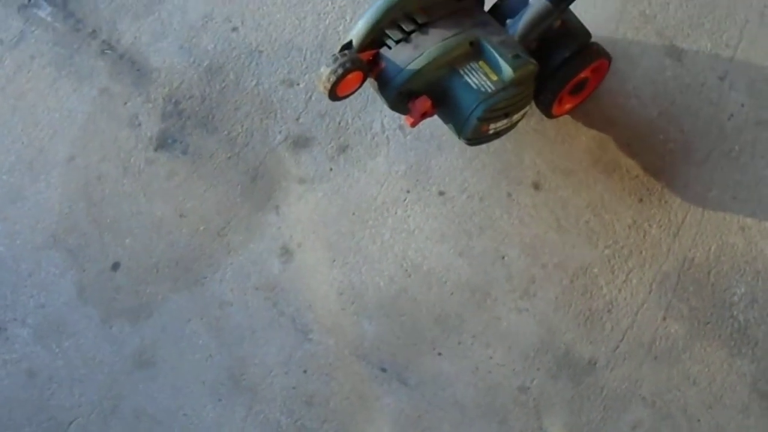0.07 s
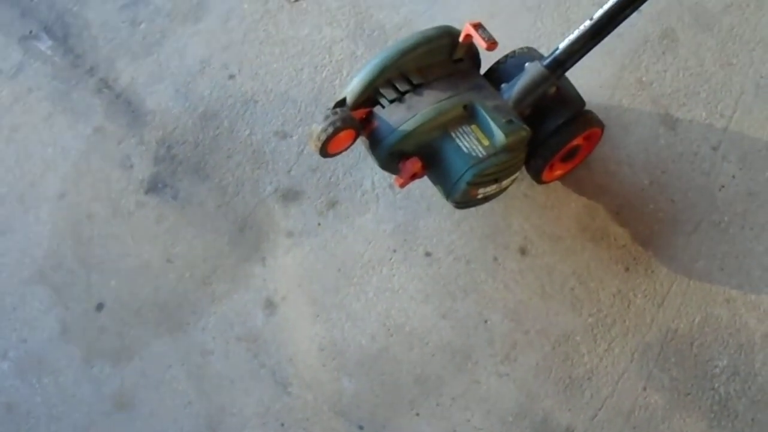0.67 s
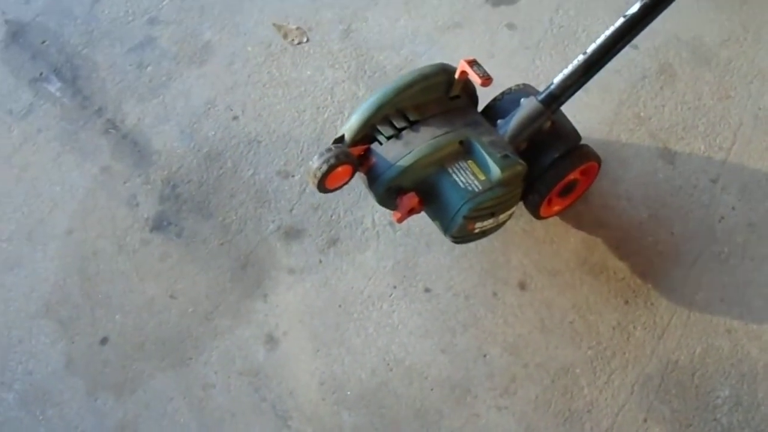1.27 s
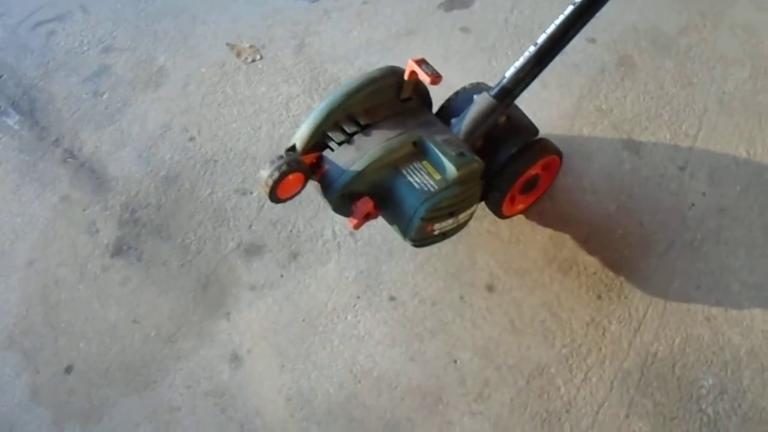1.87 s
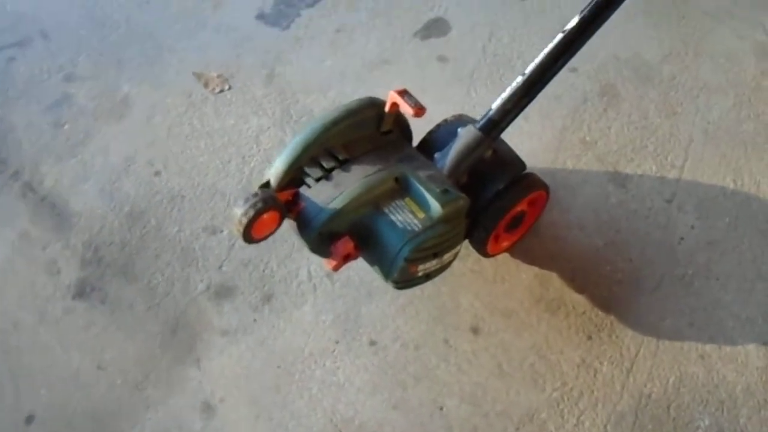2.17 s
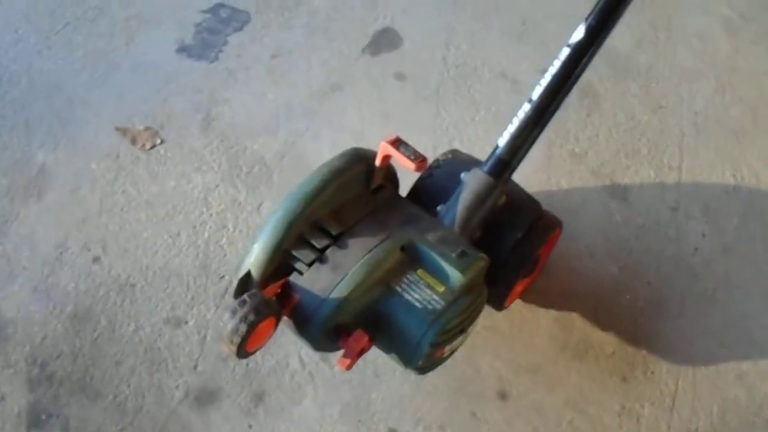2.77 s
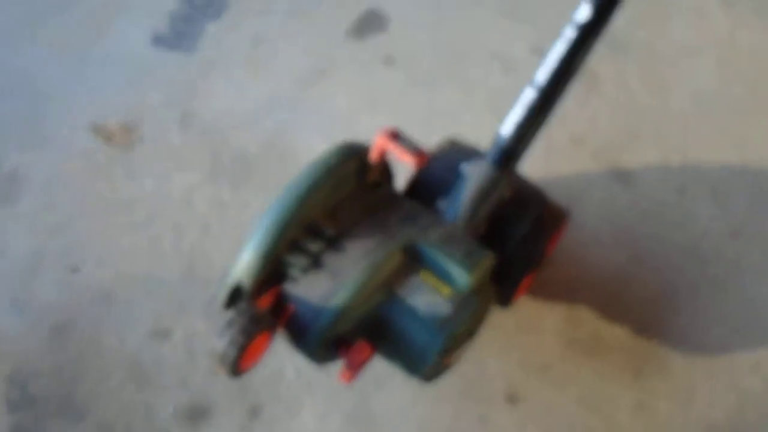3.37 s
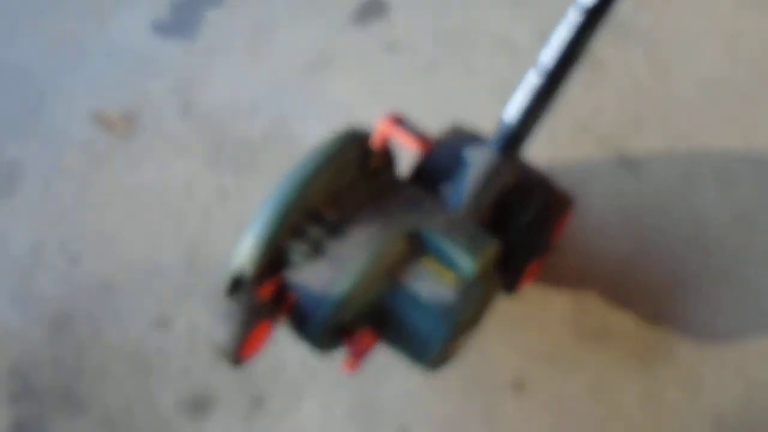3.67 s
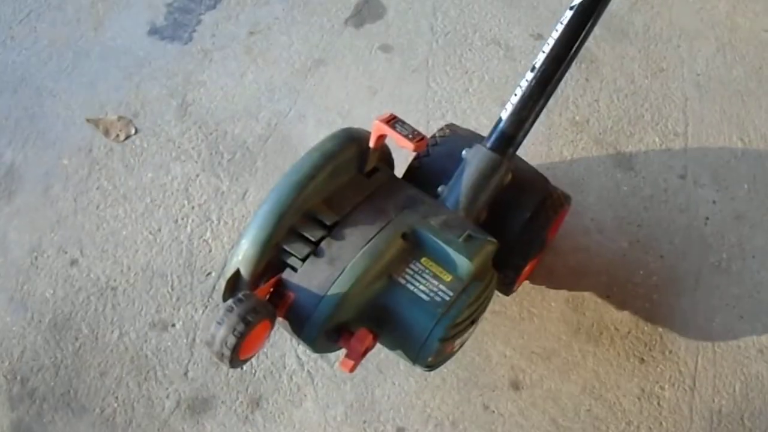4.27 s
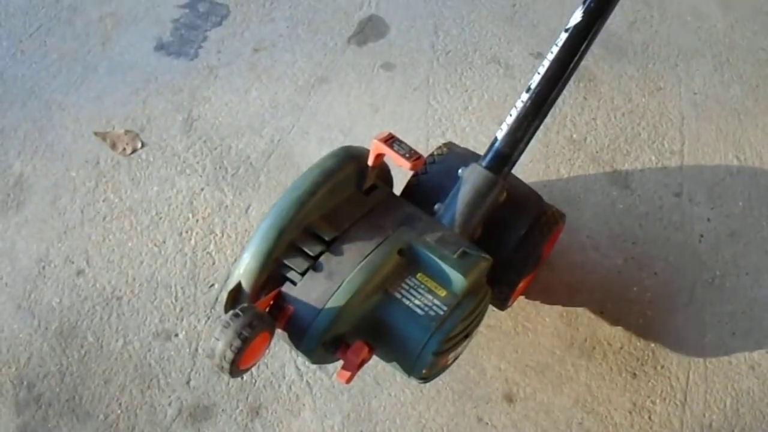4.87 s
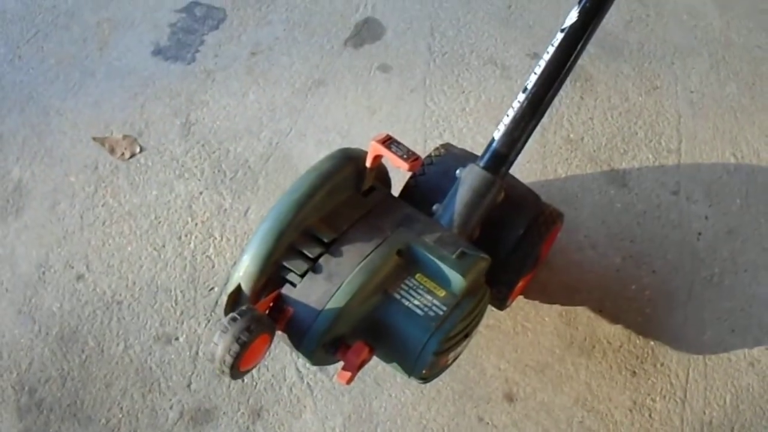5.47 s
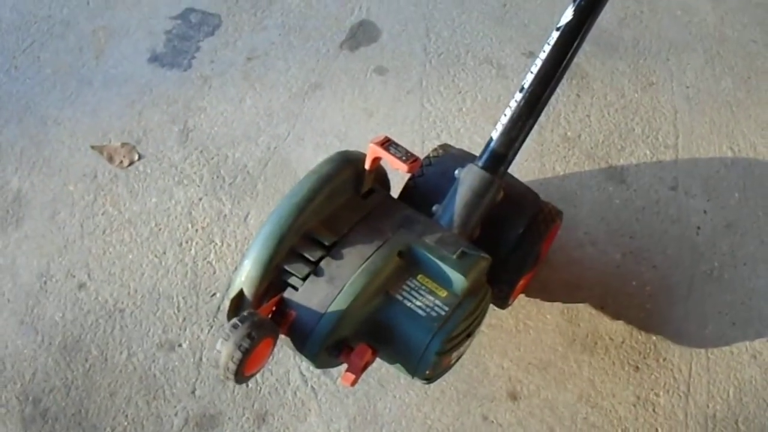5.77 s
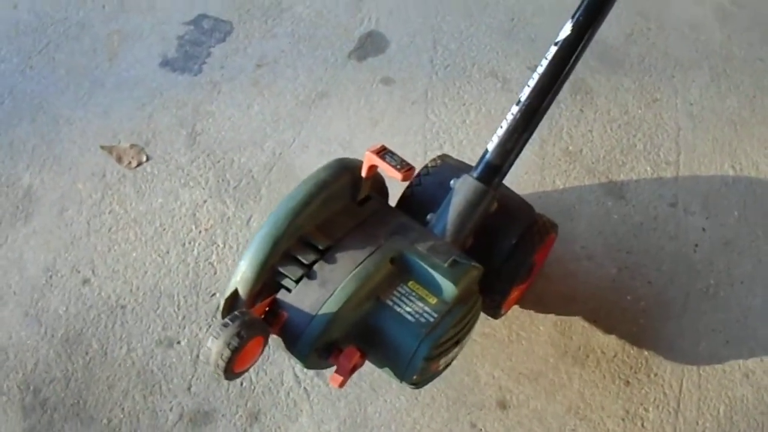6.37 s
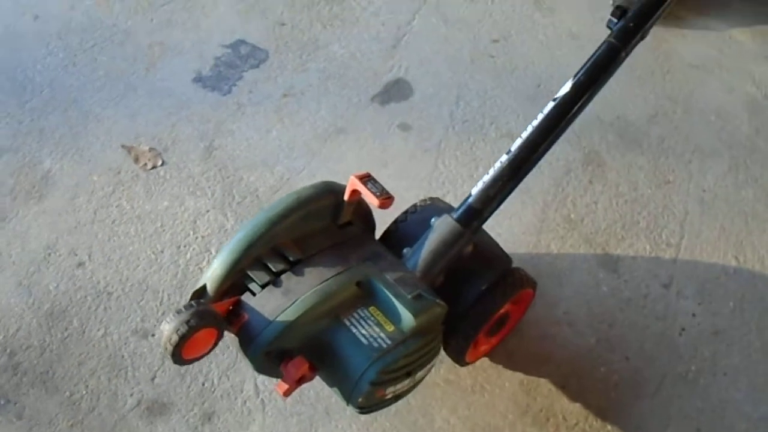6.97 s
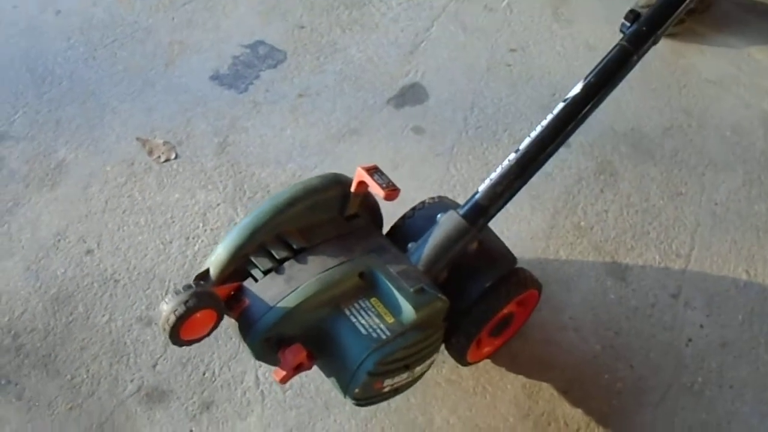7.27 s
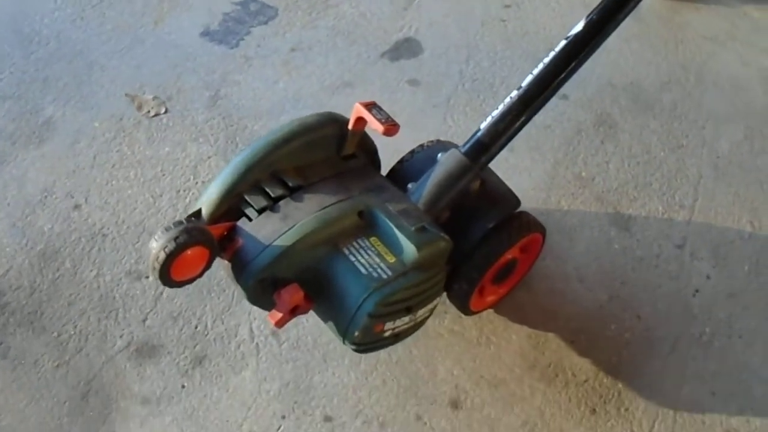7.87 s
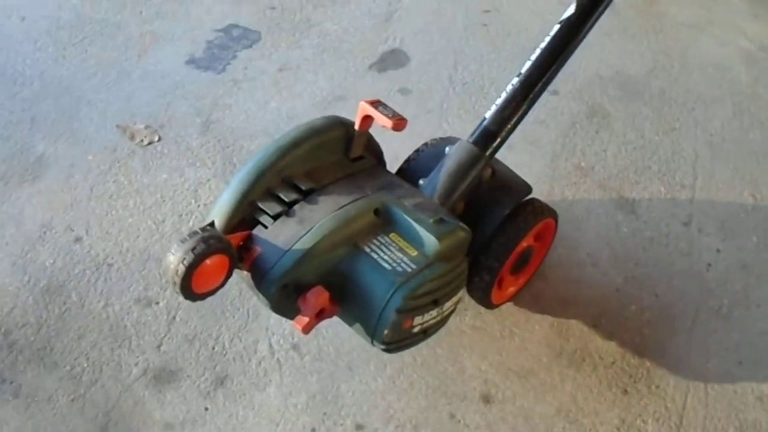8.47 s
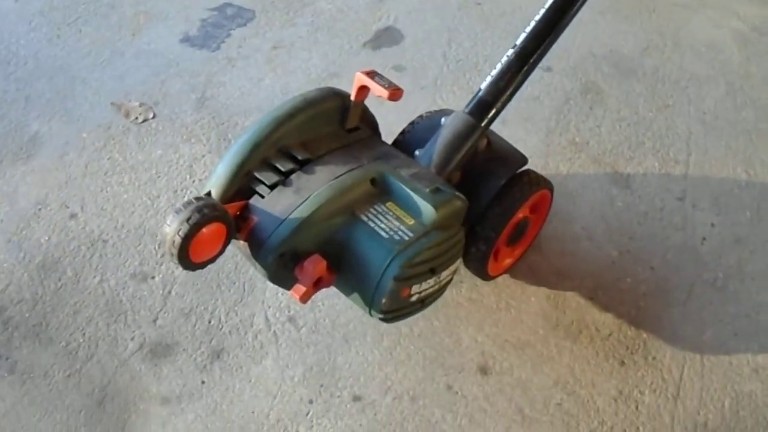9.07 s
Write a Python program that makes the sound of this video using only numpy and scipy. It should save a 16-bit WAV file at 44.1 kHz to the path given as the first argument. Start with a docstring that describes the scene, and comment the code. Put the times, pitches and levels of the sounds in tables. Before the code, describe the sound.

Loud, steady whirring of an electric edger running free indoors, its high whine wavering, with a single sharp click early on.

```python
"""An electric lawn edger whirs up and runs free over concrete, is tipped back and set down again.
Its fan and blade churn air that makes the guard and the vents ring. The motor hums, the gears rattle
at the start, and the fan whines at 14 times the motor's speed. Bare walls add a short echo.
A low sampling rate dulls the sound and mirrors the whine to a lower pitch; one sharp click cuts in."""
import sys
import numpy as np
from scipy import signal
from scipy.fft import rfft, irfft, next_fast_len
from scipy.io import wavfile

SR = 44100
rng = np.random.default_rng(int(sys.argv[2]) if len(sys.argv) > 2 else 0)


def materialize(psi):
    """Save the field psi as 16-bit PCM at rate SR to the path in sys.argv[1].

    A 1-D psi becomes a single channel; in a 2-D psi each row is a channel.
    """
    bounded = np.clip(np.atleast_2d(psi).T, -1, 1)
    quanta = np.round(bounded * 32767).astype(np.int16)
    wavfile.write(sys.argv[1], SR, quanta)


N = 406161
T = np.arange(N) / SR

START_HZ, FREE_HZ = 274, 399.4  # motor turns per second
COME_ROUND = (1.1, 1.5)  # the listener walks round to the guard's opening: start/s, length/s
# the vent's narrow beam of sound sweeps on and off the listener: t/s, level/dB below its peak
VENT_AIM = [(.9, -1), (1.65, -4), (1.9, -10.5), (2.5, -6.5), (2.85, -.5), (5.4, 0), (6.4, -3.5), (7.3, -10),
            (8.35, -7.5), (8.65, -3.5)]


def undb(db):
    """Turn decibels into a gain."""
    return 10 ** (np.asarray(db) / 20)


def unit(x):
    """Scale a signal to an average (rms) size of 1."""
    return x / np.sqrt(np.mean(x ** 2))


def curve(table):
    """Join (time, value) points with straight lines."""
    return np.interp(T, *np.transpose(table))


def shaped_noise(gain_at):
    """Noise whose strength at each frequency follows gain_at(f)."""
    size = next_fast_len(N, real=True)
    f = np.fft.rfftfreq(size, 1 / SR)
    return unit(irfft(rfft(rng.standard_normal(size)) * gain_at(f), size)[:N])


def walk(rate):
    """A smooth random wobble that changes about rate times a second."""
    return shaped_noise(lambda f: np.exp(-(f / rate) ** 2))


def turbulence(spectrum):
    """Swirling air: noise shaped by (f/Hz, level/dB) points."""
    hz, db = np.transpose(spectrum)
    return shaped_noise(lambda f: undb(np.interp(np.log(f + 1), np.log(hz), db)))


def cavity(hz, width, db):
    """Air blowing through a hollow: a band of noise, width Hz wide, around a pitch that may move."""
    lowpass = signal.butter(2, width / 2, fs=SR)
    eddies = signal.lfilter(*lowpass, rng.standard_normal(N) + 1j * rng.standard_normal(N))
    phase = 2 * np.pi * np.cumsum(hz * np.ones(N)) / SR
    return undb(db) * unit(np.real(eddies * np.exp(1j * phase)))


def move(start_s, length_s):
    """A movement's progress from 0 to 1."""
    return np.clip((T - start_s) / length_s, 0, 1)


def tipped():
    """How far the machine leans back, 0 to 1: it is tipped, held, then lowered."""
    return move(2.3, .7) - move(4.6, 2.3)


def speed(run_up_s=.28, sag_hz=2.8):
    """Motor turns per second: rising until air drag holds it, sagging a little while tipped."""
    return FREE_HZ / (1 + (FREE_HZ / START_HZ - 1) * np.exp(-T / run_up_s)) - sag_hz * tipped()


def facing(part):
    """How loud a part is as it turns toward or away from the listener."""
    # per part: level/dB, then change/dB when tipped back, listener come round, machine turned aside
    parts = { "fan": (-21, -0.8, 0.52, -1.06), "blade": (-35.5, -1.5, 0, -3),
             "mouth": (-36, -1.5, 16.5, -3), "shell": (-21, -3, 2.7, -8.5), "slots": (-19, -1.5, -3, -4),
             "sides": (-27.5, -6, -1.1, -4.5), "hum": (-38.5, -5.5, -0.64, -4),
             "octave": (-52, 6.5, 0.5, -3), }
    db, tipped_db, round_db, aside_db = parts[part]
    turned_aside = move(8.22, .1)
    return undb(db + tipped_db * tipped() + round_db * move(*COME_ROUND) + aside_db * turned_aside)


def dips(fall_s=0.041):
    """The level dips briefly, three times."""
    # t/s, depth/dB, recovery/s
    drops = [(4.09, 7.5, 0.074), (4.49, 3, 0.074), (5.69, 2.5, 0.1)]
    return undb(-sum(db * move(s, fall_s) * np.exp(-np.abs(T - s) / back) for s, db, back in drops))


def room(x, decay_s=0.61, wet_db=-11):
    """Bare walls add a fading tail of echoes whose pattern drifts as the listener moves."""
    t = T[:SR // 2]
    tails = rng.standard_normal((4, len(t))) * np.exp(-np.log(1000) * t / decay_s) * (t > .008)
    blend = np.array([walk(0.65) for _ in tails])
    blend /= np.linalg.norm(blend, axis=0)
    wet = sum(share * signal.fftconvolve(x, tail / np.linalg.norm(tail))[:N]
              for share, tail in zip(blend, tails))
    return x + undb(wet_db) * wet


def reflections(x, guard_share=-0.069, sway_ms=0.1):
    """Close echoes colour the sound; their delays slide as machine and listener move."""
    # the longer path round the guard: t/s, delay/ms
    guard_path = [(2.2, 1), (3.1, 1.68), (5.8, 1.65), (7.2, 1.37), (8.1, 1.99), (9.2, 2)]
    # echoes off the floor and nearby surfaces: delay/ms, share reflected
    echoes = [(2.15, 0.049), (2.601, 0.041), (4.7, 0.057)]
    out = x + guard_share * np.interp(T - curve(guard_path) / 1000, T, x)
    for ms, share in echoes:
        delay_s = (ms + sway_ms * walk(0.99)) / 1000
        out += share * np.interp(T - delay_s, T, x)
    return out


def gear_rattle(knocks_per_s=1500):
    """Gear teeth knock as they take up their slack at the start, ringing the housing."""
    # bursts of knocks: t/s, length/s, level/dB
    bursts = [(.01, .016, -19.5), (.076, .02, -17.5), (.132, .012, -20)]
    # the housing's rings: f/Hz, width/Hz, level/dB
    housing = [(493, 47, 6.5), (700, 79, 7.5), (1500, 400, 0), (1960, 360, 2.5), (2720, 200, 10)]
    envelope = sum(undb(db) * np.exp(-((T - s) / length) ** 2) for s, length, db in bursts)
    knocks = rng.standard_normal(N) * (rng.random(N) < knocks_per_s / SR)
    ringing = sum(undb(db) * signal.lfilter(*signal.iirpeak(hz, hz / width, fs=SR), knocks)
                  for hz, width, db in housing)
    return envelope * unit(ringing)


def gear_tones(angle, flutter_db=1.5):
    """Faint tones tied to the motor's turning; the blade shaft is geared down to 3/8."""
    return sum(undb(db + flutter_db * walk(13)) * np.sin(multiple * angle)
               for multiple, db in [(3 / 8, -58), (9 / 8, -49), (6, -44)])


def motor_hum(hz, angle, flutter_db=0.9):
    """The motor hums at its turning rate and an octave above, growing with speed."""
    hum = facing("hum") * undb(flutter_db * walk(1.9)) * np.sin(angle)
    octave = facing("octave") * undb(flutter_db * walk(6.1)) * np.sin(2 * angle)
    return (hz / FREE_HZ) ** 7 * (hum + octave)


def fan_whine(hz, angle, vanes=14, housing_hz=5150):
    """The fan's vanes whine, roughened by eddies, and flare as the pitch passes the housing's own."""
    whine = (1 + .18 * walk(76)) * np.sin(vanes * angle)
    flare_db = 6.5 * np.exp(-((vanes * hz - housing_hz) / 200) ** 2)
    level_db = -31 + curve(VENT_AIM) + flare_db + 1.3 * walk(8)
    return undb(level_db) * (hz / FREE_HZ) ** 5 * whine


def guard_rings(sink_hz=70):
    """Air rings the guard's shell and its opening, which sounds lower while tipped back."""
    mouth = facing("mouth") * cavity(880 - sink_hz * tipped(), width=300, db=-17)
    shell = facing("shell") * cavity(1440, width=130, db=-24.5)
    faint_ring = (1 - move(*COME_ROUND)) * cavity(533, width=7.7, db=-50)
    return mouth + shell + faint_ring


def vent_rings(hz, sink_hz=175.6):
    """Air rings the vent and slots; the housing's sides come through when the vent points away."""
    # rings of the housing's sides: f/Hz, width/Hz, level/dB
    side_rings = [(2953, 380, 1.5), (4890, 180, -5.5)]
    aim_db = curve(VENT_AIM)
    vent = (hz / FREE_HZ) ** 3 * cavity(3551 - sink_hz * tipped(), width=180, db=-28.5 + aim_db)
    slots = facing("slots") * cavity(4750, width=450, db=-16.5)
    sides = facing("sides") * (1 - undb(aim_db)) * sum(cavity(*ring) for ring in side_rings)
    return vent + slots + sides


def blade_rush(strain, strain_db=6):
    """The blade churns air and rings the hollow of the guard, louder while speeding up."""
    # the churned air: f/Hz, level/dB
    blade_air = [(40, -22), (120, -20.5), (180, -17), (260, -6), (350, -5.5), (400, -2.5), (500, -2.5),
                 (600, -3), (850, -10.5), (1500, -19)]
    # the hollow's rings: f/Hz, width/Hz, level/dB
    hollow = [(480, 36, -18.5), (521.5, 14, -17)]
    rush = turbulence(blade_air) + sum(cavity(*ring) for ring in hollow)
    return facing("blade") * undb(strain_db * strain) * rush


def fan_rush(hz, gust_db=0.58, bright_hz=4000):
    """The fan's gusty rush of air, which brightens a little as the motor speeds up."""
    # the cooling air: f/Hz, level/dB
    fan_air = [(30, -39.5), (120, -33.5), (250, -27), (650, -13), (1200, -7.5), (1750, -9), (1950, -5),
               (2200, -3.5), (2400, 0), (2780, 2), (3660, -1.5), (3870, -4.5), (4200, -4.5), (4950, -7.5),
               (5250, -4), (5700, -14.5)]
    rush = facing("fan") * undb(gust_db * walk(23)) * turbulence(fan_air)
    treble = signal.sosfiltfilt(signal.butter(4, bright_hz, "high", fs=SR, output="sos"), rush)
    return rush - treble * (1 - (hz / FREE_HZ) ** 1.2)


def air(hz, strain_db=2.0):
    """All the moving air, louder under the strain of speeding up."""
    # the rush swells and ebbs slightly, by under 1 dB: t/s, level/dB
    swell = [(.9, .5), (1.4, -0.2), (1.75, 0.5), (2.3, 0.65), (3.1, 0.5), (5, 0.05), (7.2, 0.4)]
    strain = (FREE_HZ - hz) / (FREE_HZ - START_HZ)
    rush = fan_rush(hz) + blade_rush(strain) + guard_rings() + vent_rings(hz)
    return undb(strain_db * strain + curve(swell)) * rush


def scene():
    """Air and rattle echo in the room; the tones, from one slightly unsteady shaft, arrive directly."""
    hz = speed()
    noise = undb(0.49) * room(reflections(air(hz) + gear_rattle()))
    angle = 2 * np.pi * np.cumsum(hz * (1 + .0003 * walk(12))) / SR
    tones = np.sqrt(2) * (motor_hum(hz, angle) + fan_whine(hz, angle) + gear_tones(angle))
    return (dips() * (noise + tones))[None]


def record(dry, click_s=1.4233, top_hz=15800):
    """Keeping every fourth sample mirrors sound just above 5.5 kHz downward; a bright click is added."""
    dulled = signal.fftconvolve(dry[0], signal.firwin(301, 5750, fs=SR), "same")
    sampled = 4 * dulled * (np.arange(N) % 4 == 0)
    smoothed = signal.fftconvolve(sampled, signal.firwin(105, 5345, window=("kaiser", 9), fs=SR), "same")
    click = signal.lfilter([.25], [1, -.4], np.arange(N) == int(click_s * SR))
    treble_cut = signal.ellip(8, .2, 70, top_hz, fs=SR, output="sos")
    return signal.sosfilt(treble_cut, smoothed + click)[None]


dry = scene()
out = record(dry)
materialize(out)
```